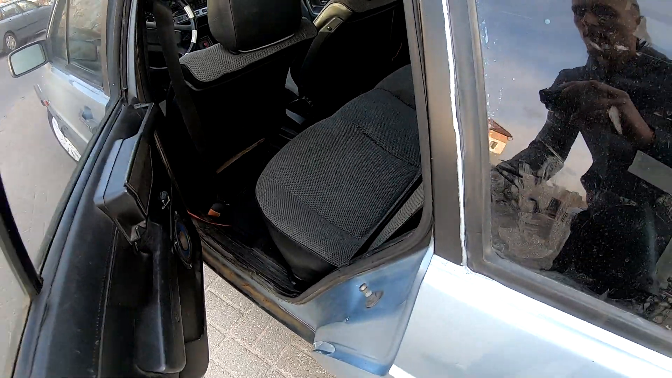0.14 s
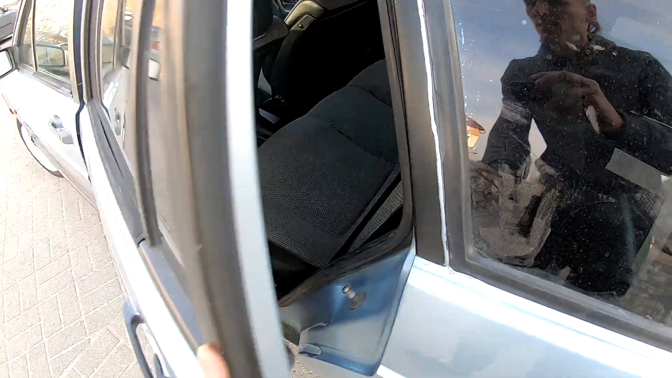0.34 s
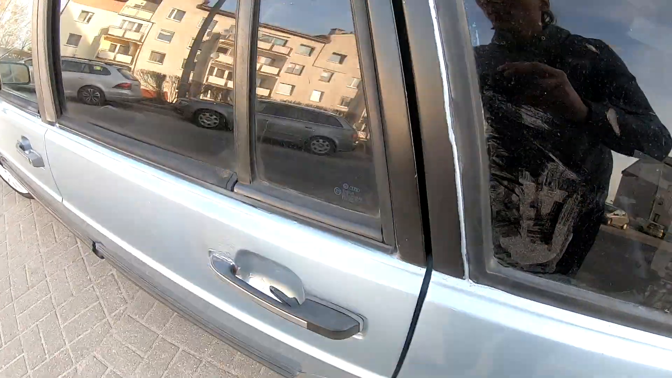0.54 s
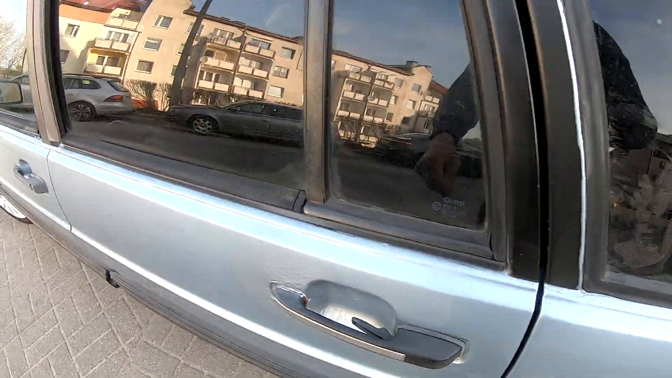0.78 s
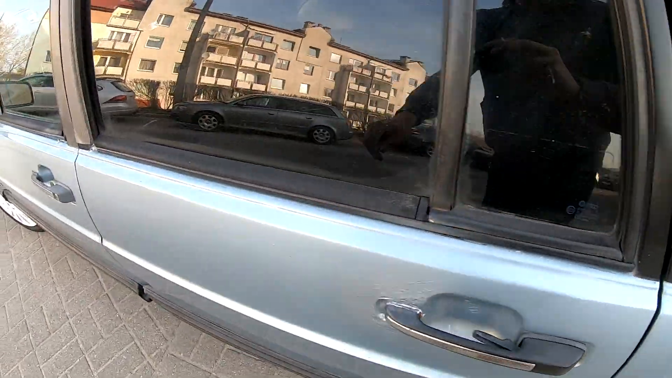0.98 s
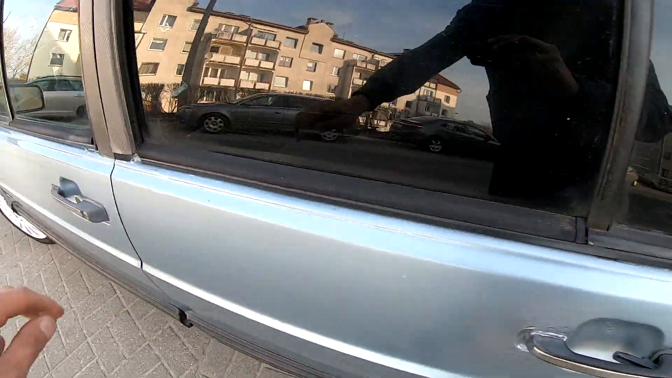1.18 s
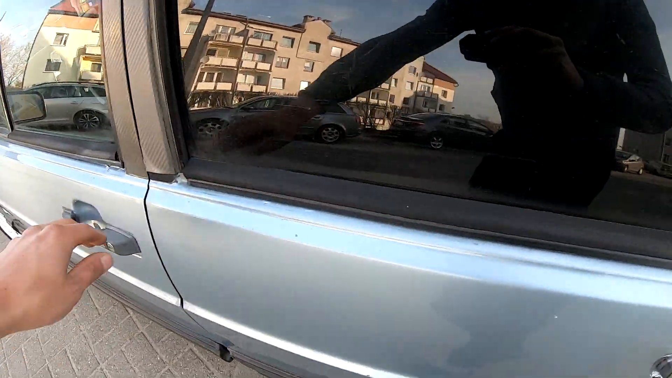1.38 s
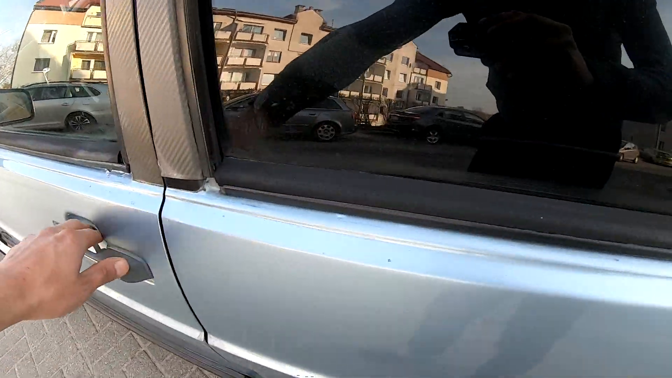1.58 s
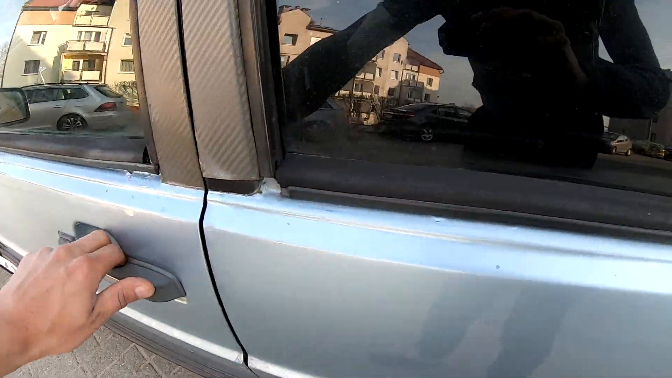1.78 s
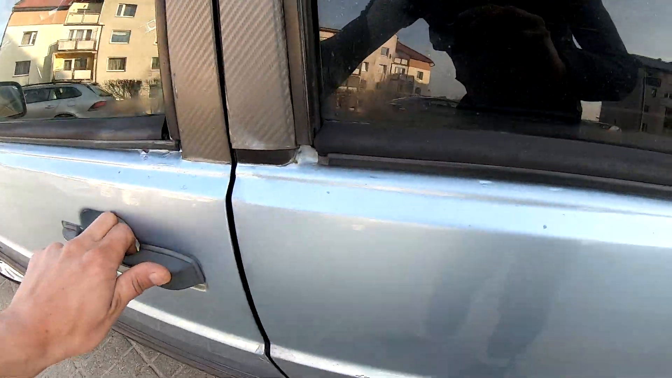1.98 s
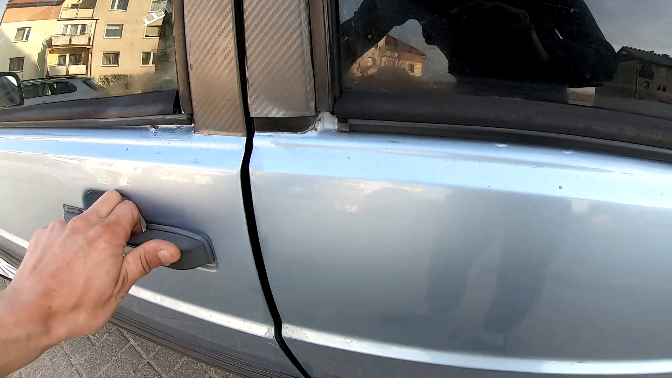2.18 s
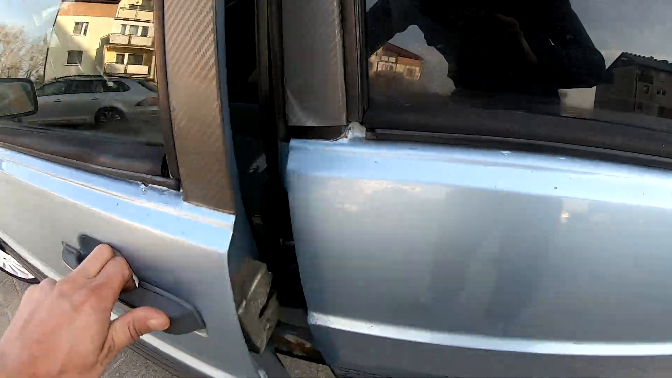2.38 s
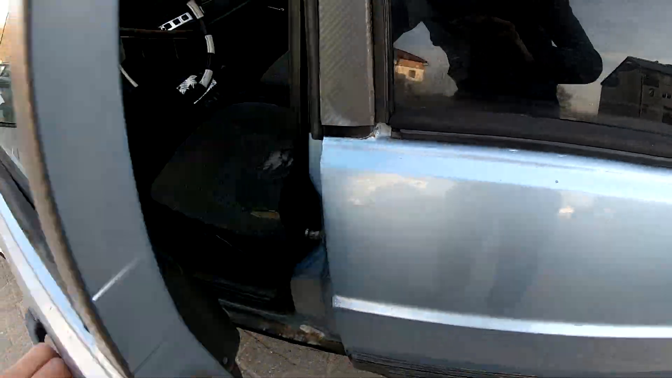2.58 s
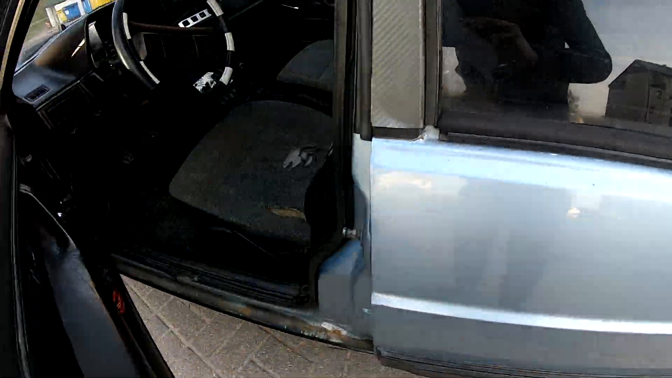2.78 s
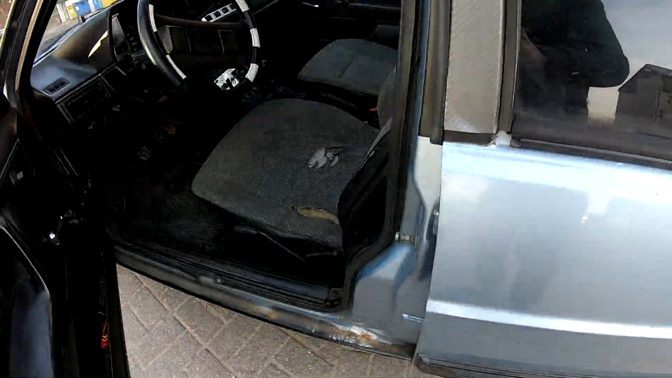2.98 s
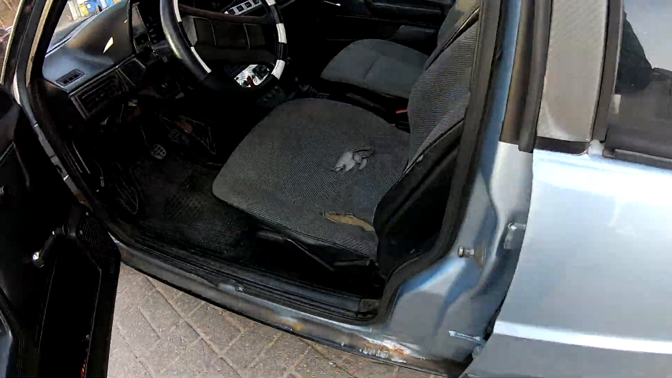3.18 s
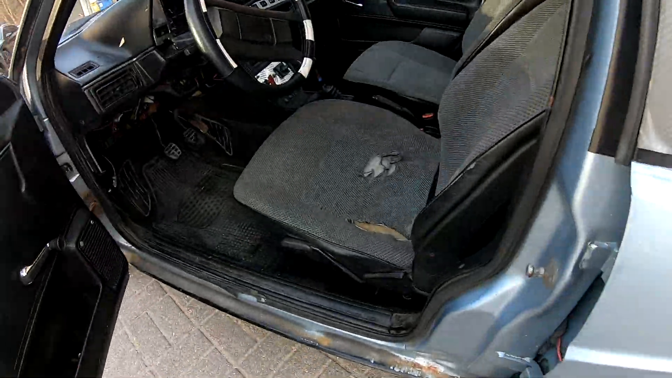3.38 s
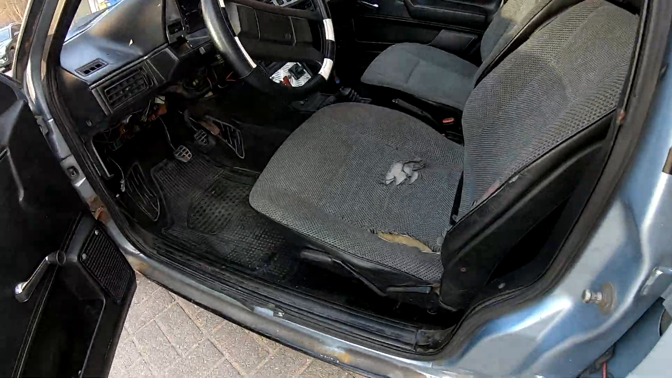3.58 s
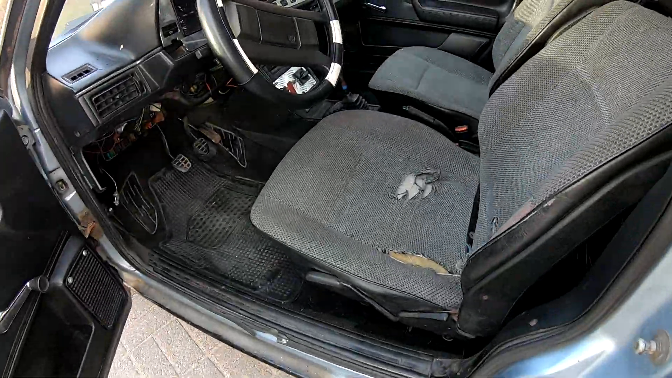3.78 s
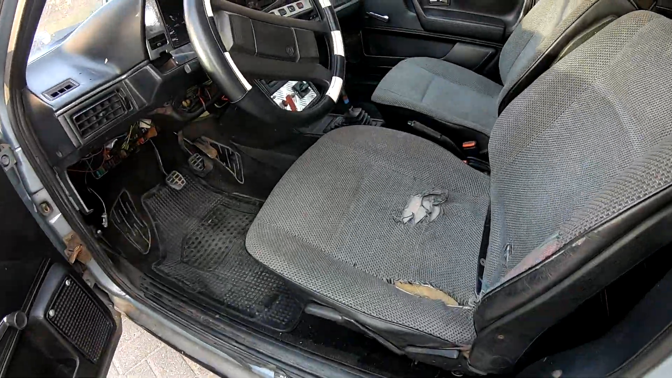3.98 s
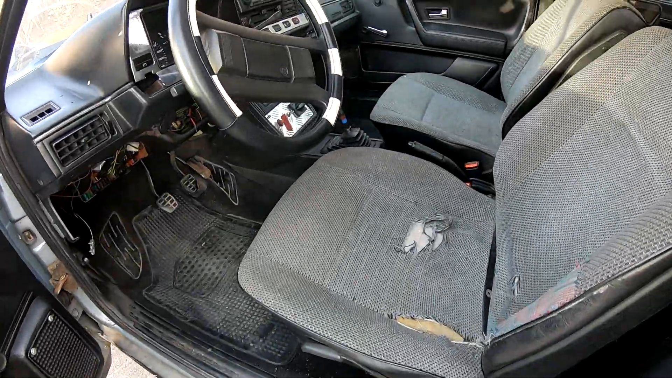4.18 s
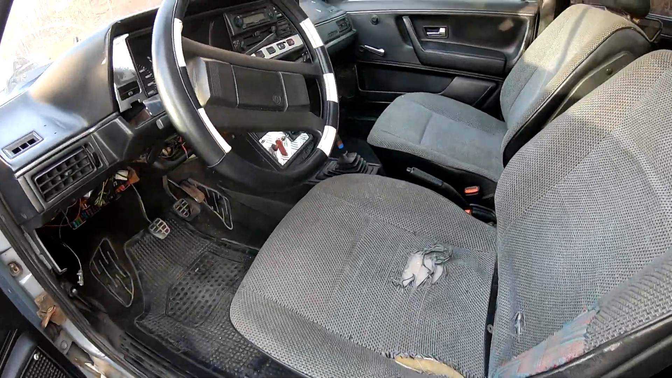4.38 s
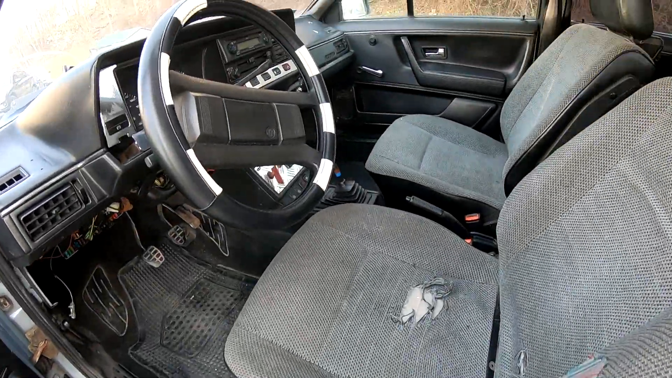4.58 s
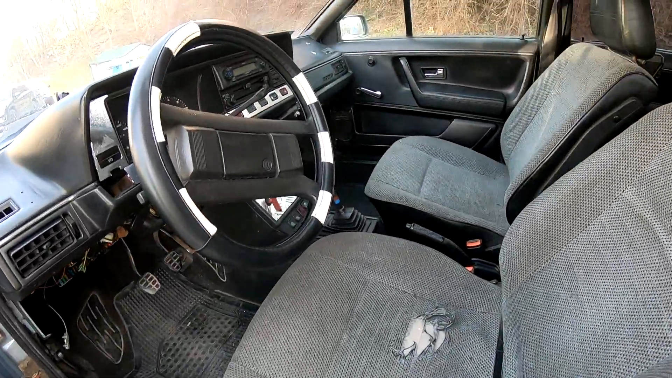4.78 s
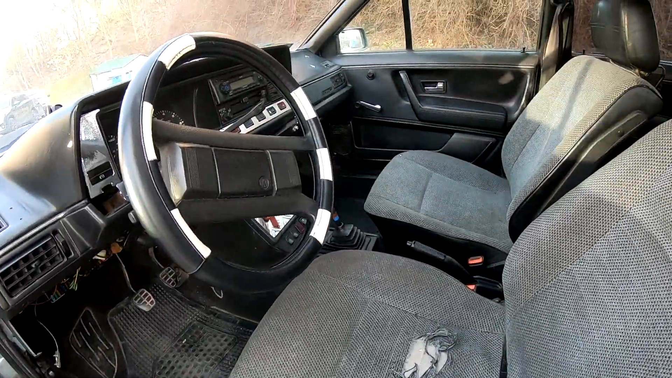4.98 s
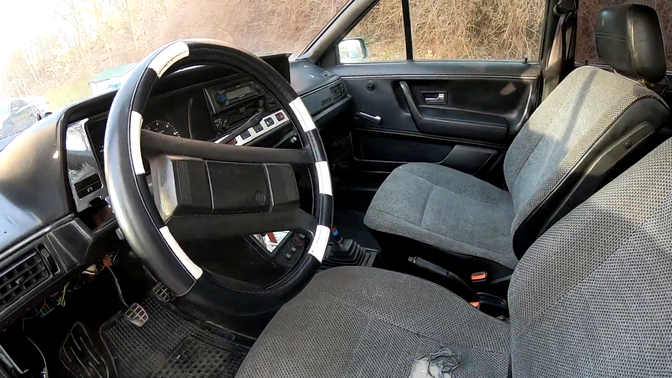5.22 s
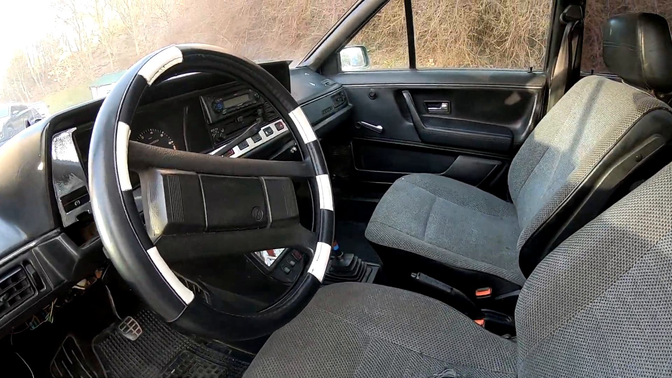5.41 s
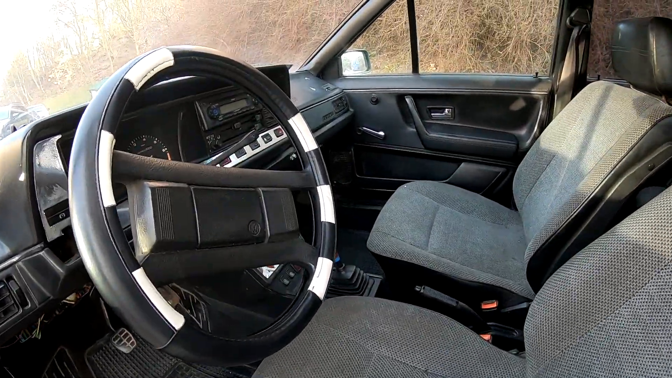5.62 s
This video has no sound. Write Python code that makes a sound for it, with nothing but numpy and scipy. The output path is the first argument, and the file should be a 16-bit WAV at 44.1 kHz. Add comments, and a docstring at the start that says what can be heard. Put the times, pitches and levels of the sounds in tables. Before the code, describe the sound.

A faint hinge squeak and heavy car door slam, then handle clicks and a latch release, over a low engine drone growing hollow inside the cabin.

```python
"""An engine idles close by on a street; its door hinge squeaks faintly and a car's rear door slams.
A hand pulls the front handle, the latch lets go and the door swings open over its check strap.
The microphone then leans into the cabin, where the drone swells; clothes and shoes rustle.
The drone is a harmonic series, the rush of the engine and cabin is filtered noise, and door parts
are short noise bursts and decaying modes."""
import sys
import numpy as np
from scipy import signal
from scipy.fft import rfft, irfft
from scipy.io import wavfile
from scipy.ndimage import uniform_filter1d

SR = 44100
rng = np.random.default_rng(int(sys.argv[2]) if len(sys.argv) > 2 else 0)


def unload_wav(signal):
    """Save mono or channel-first audio to the path in sys.argv[1] as 16-bit WAV at rate SR, clipped to [-1, 1]."""
    wavfile.write(
        sys.argv[1],
        SR,
        np.round(np.clip(np.atleast_2d(signal).T, -1, 1) * 32767).astype(np.int16),
    )


N = 249165
TIME = np.arange(N) / SR

# engine firing, which settles and then creeps up: (time [s], firing rate [Hz])
FIRING = [(0, 63), (.3, 65.24), (.75, 58.4), (1.9, 55.37), (3.6, 56.08), (4.4, 57.54), (5.65, 58.3)]
# drone where the microphone is: (time [s], firing tone [dB], overtones [dB])
DRONE_LEVEL = [(0, -32, -44), (.5, -27, -43.5), (1.5, -36.5, -45.5), (2.1, -27.5, -37), (2.6, -31, -37.5),
               (3.1, -23, -32.5), (3.6, -23.5, -29), (4.0, -17, -30.5), (4.8, -22, -32),
               (5.65, -32.5, -34.5)]
# second to fifth harmonic, relative to the overtone level: (level [dB])
OVERTONES_DB = [2, -1.5, -11.5, -19]
# nearness to the running engine, which sets its noises: (time [s], nearness [dB])
NEARNESS = [(0, -8), (.5, -5.5), (1.6, -5.5), (2.0, -2), (3.3, -1.5), (4.1, 0), (4.8, 4), (5.65, .5)]
# spectral shapes of the engine's low, middle and high noise: (frequency [Hz], density [dB per Hz])
RUMBLE = [(12, -4), (30, -5.5), (60, -0.5), (110, 0), (190, -3.5), (270, -8.5), (360, -26), (700, -68)]
WHIRR = [(150, -2), (330, -6.5), (480, -5), (620, -3), (950, -2), (1400, -7), (2000, -12.5), (2700, -15),
         (4000, -28.5), (8000, -57.5)]
HISS = [(1200, -21.5), (2800, 4), (3600, 1.5), (4500, -1.5), (6500, -4), (7400, -9.5), (9800, -10),
        (10800, -21), (12500, -23.5), (14000, -41.5)]
# spectral shape of the cabin's hollow roar: (frequency [Hz], density [dB per Hz])
CABIN = [(200, -19.5), (290, 9), (360, 0), (430, 3), (520, 2), (620, -14), (800, -19.5), (950, -0.5),
         (1200, -21.5), (2000, -56)]
# metal blows of latch, handle and check strap: (time [s], relative level [dB], chatter decay [s],
# spectral tilt [dB per octave], note of the struck part [Hz], relative level of the note [dB])
BLOWS = [(.541, -29.5, 0.018, -5.5, 2800, -6), (.563, -13, 0.0046, 0, 1165, -7),
         (.572, -15.5, 0.0034, 0, 1260, 0), (.579, -14, 0.0045, 1, 2200, -5),
         (.583, -17, 0.0054, 3.5, 5050, -13), (.604, -24.5, 0.017, 0, 850, -2),
         (1.686, -35.5, 0.0032, 4.5, 2780, -9), (1.813, -38, 0.0033, 2.5, 780, -4),
         (1.835, -36, 0.0095, 1, 556, 7), (1.889, -33.5, 0.02, -9.5, 1004, -1),
         (1.9965, -26, 0.012, -5, 2760, -11), (2.183, -44.5, .0066, -13, 724, 12.5),
         (2.286, -34.5, 0.016, 2.5, 943, 5), (2.308, -22.5, 0.0084, 0, 890, -3.5),
         (2.321, -27, .016, 0, 437, 2.5), (2.3676, -22, 0.0045, 2.5, 3060, -6),
         (2.764, -34, 0.011, -4.5, 844, 8), (2.937, -32.5, 0.0045, 2, 2410, -4),
         (2.95, -27, 0.0099, 2, 1700, 5.5), (2.9652, -20, 0.005, 5.5, 1705, 3),
         (2.974, -19.5, 0.0082, -4.5, 740, 0.5), (2.994, -29, 0.0056, 5.5, 4960, -8)]
# spectral shape of struck steel before tilting: (frequency [Hz], density [dB per Hz])
STEEL = [(60, -21), (200, 12.5), (400, -3), (700, -1.5), (1200, 1), (2200, -3.5), (3200, -8), (5500, -16),
         (7000, -25.5), (9500, -27.5), (11500, -38), (14500, -55)]
# modes of the door's steel: (frequency [Hz], relative level [dB], t60 [s])
STEEL_MODES = [(608, -7, 0.19), (890, -21, .15), (938, 3, .1), (1213, -9, 0.24), (1240, -5, 0.09),
               (1638, 0.5, 0.14), (1800, -3, 0.094), (1947, 6.5, 0.058), (2454, -1, 0.059),
               (2426, -2.5, 0.057), (3330, -70, .08), (3680, -8, 0.048), (4150, 6.5, 0.023),
               (5200, -40, .08), (5800, -9, 0.069), (7940, -16, 0.11)]
# echoes of the street: (frequency [Hz], t60 [s])
STREET_DECAY = [(100, 0.92), (500, 0.39), (2000, 0.98), (6000, 0.83), (12000, 0.48)]
# pushes on the whole door: (time [s], boom peak [dB], push length [s], share of full ring time [1],
# panel shudder [dB])
PUSHES = [(.563, -19, 0.0025, .42, -15.5), (.582, -3, 0.011, 0.98, -15.5), (0.605, -9, 0.0024, 0.86, -18.5),
          (2.373, -22, 0.0044, 0.27, -45), (2.975, -22, .002, 0.15, -35.5)]
# modes of door skin and cabin air: (frequency [Hz], relative level [dB], full t60 [s])
BOOM_MODES = [(32.2, -1.5, 0.95), (46.2, 5, 0.43), (72.5, -2.5, 1), (85, -6, 0.2), (98, 1.5, 0.74),
              (129, -14, 0.22), (200, -26, 0.43), (224.5, 4, 0.42), (278, 0.5, 0.089), (308, -15, 0.096),
              (384, -0.5, 0.24), (503, -20, .24), (604, -8, .22)]
# spectral shape of shuddering trim and glass: (frequency [Hz], density [dB per Hz])
BODY = [(30, -34), (90, 11.5), (200, 5), (330, 0.5), (420, -6.5), (600, -3), (900, -16), (1500, -49),
        (4000, -60)]
# sleeve, fingers and soles rubbing: (time [s], length [s], level [dB])
RUSTLES = [(1.003, 0.14, -43.5), (1.151, .045, -51), (1.642, 0.039, -46.5), (1.938, 0.36, -55),
           (2.542, 0.089, -50), (3.002, 0.29, -56.5), (3.636, .13, -47.5), (4.179, .04, -51),
           (5.141, 0.047, -46.5)]
# spectral shape of rubbing: (frequency [Hz], density [dB per Hz])
CLOTH = [(400, 5), (1500, 2.5), (3200, 3.5), (6500, -1.5), (9800, -4.5), (11500, -14), (14000, -26)]
# sharp ticks of the handle spring and small parts: (time [s], relative level [dB])
TICKS = [(1.004, -39), (1.665, -40), (1.835, -32.5), (2.015, -31.5), (2.080, -35.5), (2.099, -26),
         (2.108, -25.5), (2.189, -31.5), (2.302, -32), (2.316, -22.5), (2.815, -37), (3.673, -35.5),
         (4.094, -39.5), (4.213, -38.5), (5.164, -34.5)]
# spectral shape of the ticks: (frequency [Hz], density [dB per Hz])
SPRING = [(500, -38), (2400, -13.5), (3400, 8.5), (4600, -3.5), (6500, -2), (9500, -3.5), (11500, -16.5),
          (14500, -27)]
# the handle reaches its stop and knocks on the hollow door: (time [s], peak level [dB])
KNOCKS = [(1.999, -13), (2.012, -12), (2.025, -27)]
# modes of the hollow door: (frequency [Hz], relative level [dB], t60 [s])
HOLLOW_MODES = [(49, -6, 0.44), (127, 0.5, 0.106), (180, 1.5, 0.08), (228, -8.5, 0.092), (480, -17, 0.057)]
# modes of the check strap: (frequency [Hz], relative level [dB], t60 [s])
STRAP_MODES = [(272, -0.5, 0.046), (333, -2.5, 0.06), (1260, -9.5, .04), (2090, -5, 0.027),
               (2270, -9, 0.021), (2550, -14, 0.035)]
# stereo width: (frequency [Hz], gain of the side signal [dB])
WIDTH = [(60, -4), (250, -18), (500, -2.5), (1000, 3), (2300, 5), (2900, 0.5), (3500, -41)]

RUMBLE_DB, WHIRR_DB, HISS_DB = -33.5, -41.5, -56  # at a nearness of 0 dB, before the changes below
RUMBLE_GROWTH, HISS_GROWTH = 0.86, 1.21  # dB for each dB of nearness
RUMBLE_WITH_DRONE, USUAL_DRONE_DB = 0.38, -26.5  # rumble also swells where the firing tone is strong
NODE_S, NODE_WIDTH_S, NODE_DB = 4.55, .35, -21  # microphone passes a dead spot of the second harmonic
SCREEN_DB, SCREEN_END_S = -13, 0.38  # the open door screens the hiss until it swings away
ENTER_S, ENTER_TAKES_S = 3.53, 0.33  # the microphone leans into the cabin
OUTSIDE_DB, INSIDE_DB = -62, -46  # cabin roar before the two changes below
DOORWAY_S, DOORWAY_WIDTH_S, DOORWAY_DB = 4.06, .2, 5  # extra roar in the door opening
DEEPER_DB_PER_S = 2.5  # steady rise of the roar, zero at DOORWAY_S
SQUEAK_S, SQUEAK_HZ, SQUEAK_SINK_HZ_PER_S = .11, 2700, 2200  # the hinge as the door swings shut
SQUEAK_DB, SQUEAK_RISE_S, SQUEAK_LENGTH_S = -54, 0.028, 0.25
REBOUND_S, REBOUND_DB = .021, -21  # each struck part bounces once
# the spring crackles as the handle is pulled
PULL_S, PULL_LENGTH_S, PULL_TICKS_PER_S, PULL_TICK_DB = 1.95, .13, 35, -39
# faint ticks of handling
STRAY_FROM_S, STRAY_LENGTH_S, STRAY_TICKS_PER_S, STRAY_TICK_DB = 1.25, 3.1, 4.6, -47.5
DRAG_S, DRAG_LENGTH_S, DRAG_DB, SLIPS_PER_S = 2.78, 0.21, -38, 180  # check strap as the door opens
AGC_THRESHOLD_DB, AGC_ATTACK_S, AGC_RECOVERY_DB_PER_S = -19, 0.21, 12
EDGE_HZ = 14400  # upper band limit


def amp(db):
    """Level to amplitude: 20 dB is a factor of ten."""
    return 10 ** (np.asarray(db) / 20)


def unit(x):
    """Normalization: scales a signal to rms 1."""
    return x / np.sqrt(np.mean(x ** 2) + 1e-20)


def along(rows):
    """Linear interpolation: each column of a time curve at every sample."""
    s, *columns = np.transpose(rows)
    return [np.interp(TIME, s, column) for column in columns]


def at_hz(points, hz):
    """Spectral interpolation: reads a curve on a log-frequency axis."""
    f, value = np.transpose(points)
    return np.interp(np.log(hz + 1), np.log(f), value)


def add(mix, s, sound):
    """Superposition: adds a sound to the mix in place from time s."""
    part = mix[..., round(s * SR):][..., :sound.shape[-1]]
    part += sound[..., :part.shape[-1]]


def colour(x, points, tilt_db=0, size=4096):
    """Minimum-phase filtering: a causal filter of unit energy shapes the spectrum."""
    hz = abs(np.fft.fftfreq(size, 1 / SR))
    octaves = np.log2(np.maximum(hz, 400) / 1000)  # the tilt stops below 400 Hz
    log_gain = np.log(amp(at_hz(points, hz) + tilt_db * octaves))
    # the phase follows from the log gain by the Hilbert transform
    response = np.exp(np.conj(signal.hilbert(log_gain)))
    taps = np.fft.ifft(response).real[:size // 2]
    taps = taps / np.linalg.norm(taps)
    return signal.oaconvolve(x, taps[None], axes=1)[:, :x.shape[1]]


def noise(size, side=1):
    """Interchannel correlation: white noise in two channels; side 0 is mono, 1 unrelated."""
    mid, difference = rng.standard_normal((2, size))
    return unit(np.array([mid + side * difference, mid - side * difference]))


def wander(hz, size=N):
    """Random modulation: joined random points, two per cycle of the given rate, at rms 1."""
    knots = rng.standard_normal(N // 8)
    position = np.arange(size) / SR * 2 * hz
    return unit(np.interp(position, np.arange(len(knots)), knots))


def ring(modes, t, hold=1, scatter=0):
    """Modal decay: a sum of dying sines; scatter varies their balance with the spot struck."""
    hz, db, t60 = np.transpose(modes)[:, :, None]
    share = 1 + scatter * rng.standard_normal(hz.shape)
    decay = amp(db - 60 * t / (t60 * hold))
    return (share * decay * np.sin(2 * np.pi * hz * t)).sum(0)


def arch(t, length):
    """Half-sine envelope: rises from 0 to 1 and back over the given length."""
    return abs(np.sin(np.pi * np.clip(t / length, 0, 1)))


def off_flank(x):
    """Comb filtering: a reflection off the car's side, its delay drifting as the microphone moves."""
    late = TIME - 0.000549 * np.exp(0.17 * wander(2.5))
    return np.array([channel + 0.24 * np.interp(late, TIME, channel) for channel in x])


def engine():
    """Harmonic series and modulated noise: uneven firings drone; noises grow with nearness."""
    turn = 2 * np.pi * np.cumsum(along(FIRING)[0]) / SR + 0.27 * wander(9.2)
    drone_db, overtone_db = along(DRONE_LEVEL)
    near_db = along(NEARNESS)[0]
    rumble_db = RUMBLE_DB + RUMBLE_GROWTH * near_db + RUMBLE_WITH_DRONE * (drone_db - USUAL_DRONE_DB)
    node_db = NODE_DB * np.exp(-((TIME - NODE_S) / NODE_WIDTH_S) ** 2)

    drone = amp(drone_db + 0.23 * wander(25)) * np.cos(turn)
    for k, db in enumerate(OVERTONES_DB, 2):
        level_db = overtone_db + db + (k == 2) * node_db + 1.85 * wander(8)
        drone += amp(level_db) * np.cos(k * turn + 2 * np.pi * rng.random())

    # whirr and hiss throb with the firings, and at half their rate
    throb_db = 0.8 * np.cos(turn) + 0.3 * np.cos(turn / 2) + 0.13 * wander(30)
    screen_db = SCREEN_DB * np.maximum(1 - TIME / SCREEN_END_S, 0)
    hiss_db = HISS_DB + HISS_GROWTH * near_db + screen_db + 1.5 * throb_db
    rumble = amp(rumble_db) * colour(noise(N), RUMBLE)
    whirr = amp(WHIRR_DB + near_db + throb_db) * colour(noise(N, side=0.69), WHIRR)
    hiss = amp(hiss_db) * colour(noise(N, side=0.69), HISS)
    return drone + rumble + off_flank(whirr + hiss)


def cabin():
    """Cavity coloration: the interior's hollow roar rises, most strongly in the door opening."""
    inside = np.clip((TIME - ENTER_S) / ENTER_TAKES_S, 0, 1)
    db = OUTSIDE_DB + (INSIDE_DB - OUTSIDE_DB) * inside
    db = db + DEEPER_DB_PER_S * (TIME - DOORWAY_S)
    db = db + DOORWAY_DB * np.exp(-((TIME - DOORWAY_S) / DOORWAY_WIDTH_S) ** 2)
    return amp(db + 2.0 * wander(25)) * colour(noise(N, side=0.2), CABIN)


def squeak():
    """Frequency modulation: an unsteady squeal swells quickly, then fades as it sinks in pitch."""
    t = np.clip(TIME - SQUEAK_S, 0, SQUEAK_LENGTH_S)
    unsteady = 1 + .009 * wander(201) + 0.0083 * wander(25)
    hz = (SQUEAK_HZ - SQUEAK_SINK_HZ_PER_S * t) * unsteady
    swell = np.minimum(t / SQUEAK_RISE_S, 1) * np.sqrt(1 - t / SQUEAK_LENGTH_S)
    return swell * amp(SQUEAK_DB + 2.1 * wander(70)) * np.sin(2 * np.pi * np.cumsum(hz) / SR)


def blow(chatter, tilt_db, note_hz, note_db):
    """Impact excitation: steel chatters, the struck part sounds its note and the door rings on."""
    t = np.arange(SR // 3) / SR
    contact = (1 - np.exp(-t / 0.00048)) * (np.exp(-t / chatter) + amp(-22) * np.exp(-t / 0.018))
    bounces = noise(len(t), side=0.63) * amp(3.8 * wander(900, size=len(t)))
    crack = unit(colour(bounces * contact, STEEL, tilt_db)) * np.sqrt(np.mean(contact ** 2))
    note_envelope = (1 - np.exp(-t / 0.00031)) * np.exp(-t / 0.0062)
    note = amp(note_db) * note_envelope * np.sin(2 * np.pi * note_hz * t)
    steel = np.array([ring(STEEL_MODES, t, scatter=0.61) for _ in range(2)])  # one per channel
    return amp(3.0) * crack + amp(0.5) * note + amp(-19.5) * steel


def latch():
    """Impact and rebound: every metal blow is followed by one weaker blow."""
    out = np.zeros((2, N))
    for s, db, *part in BLOWS:
        add(out, s, amp(db) * blow(*part))
        add(out, s + REBOUND_S, amp(db + REBOUND_DB) * blow(*part))
    return out


def street(x):
    """Diffuse reflection: scattered echoes from paving, parked cars and house fronts."""
    sparse = noise(SR) * (rng.random(SR) < .1)
    hz, t, z = signal.stft(sparse, SR, nperseg=256)
    decay = amp(-60 * t / at_hz(STREET_DECAY, hz)[:, None])
    z = z * decay * (1 - np.exp(-t / 0.031))
    tail = signal.istft(z, SR, nperseg=256)[1]
    return signal.fftconvolve(x, tail / np.linalg.norm(tail[0]), axes=1)[:, :N]


def thumps():
    """Forced modal response: pushes on the door, the seal taking its weight at the slam and the door jolting as
    it opens; skin and air boom, trim and glass shudder."""
    out = np.zeros((2, N))
    t = np.arange(SR * 3 // 4) / SR
    for s, db, length, hold, shudder_db in PUSHES:
        push = np.sin(np.pi * np.minimum(t / length, 1))
        boom = signal.fftconvolve(ring(BOOM_MODES, t, hold), push)[:len(t)]
        fade = (1 - np.exp(-t / 0.003)) * np.exp(-t / 0.048)
        shudder = unit(colour(noise(len(t), side=0.41) * fade, BODY)) * np.sqrt(np.mean(fade ** 2))
        add(out, s, amp(db) * boom / abs(boom).max() + amp(shudder_db) * shudder)
    return out


def rustles():
    """Sliding friction: short strokes of fine, clumped noise grains."""
    out = np.zeros((2, N))
    for s, length, db in RUSTLES:
        stroke = np.sqrt(arch(TIME[:SR // 2], length))
        clumps_db = 2.5 * wander(299, size=len(stroke)) + 1.8 * wander(35.6, size=len(stroke))
        grains = unit(noise(len(stroke), side=0.51) * amp(clumps_db))
        add(out, s, amp(db) * stroke * grains)
    return colour(out, CLOTH)


def sprinkle(start, length, per_s, db):
    """Jittered timing: one event of uneven strength in each time slot, as rows (time [s], level [dB])."""
    slots = np.arange(start, start + length, 1 / per_s)
    late, strength = rng.random((len(slots), 2)).T
    return list(zip(slots + late / per_s, db + 9 * (strength - .5)))


def ticks():
    """Transient excitation: tiny bright noise snaps with a very short ring."""
    out = np.zeros((2, N))
    t = np.arange(SR // 20) / SR
    crackle = sprinkle(PULL_S, PULL_LENGTH_S, PULL_TICKS_PER_S, PULL_TICK_DB)
    strays = sprinkle(STRAY_FROM_S, STRAY_LENGTH_S, STRAY_TICKS_PER_S, STRAY_TICK_DB)
    decay = np.exp(-t / 0.0029) + amp(-18.0) * np.exp(-t / 0.012)
    for s, db in TICKS + crackle + strays:
        add(out, s, amp(db - 3.0) * noise(len(t), side=0.64) * decay)
    return colour(out, SPRING)


def knocks():
    """Cavity resonance: dull knocks through the handle's mount ring the hollow door."""
    out = np.zeros((2, N))
    t = np.arange(SR // 3) / SR
    hollow = ring(HOLLOW_MODES, t) * (1 - np.exp(-t / 0.0032))
    for s, db in KNOCKS:
        add(out, s, amp(db) * hollow / abs(hollow).max())
    return out


def strap():
    """Stick-slip friction: uneven slips ring the check strap's steel, swelling and easing with the swing."""
    t = np.arange(SR // 8) / SR
    slip_rate = np.maximum(SLIPS_PER_S * (1 + .5 * wander(200)), 0)
    slips = np.diff(np.floor(np.cumsum(slip_rate) / SR), prepend=0)  # 1 at each slip
    rub = unit(signal.oaconvolve(slips * rng.standard_normal(N), ring(STRAP_MODES, t))[:N])
    return amp(DRAG_DB) * arch(TIME - DRAG_S, DRAG_LENGTH_S) * rub


def gain_control(x):
    """Dynamic compression: a loud sound turns the gain down; it recovers at a steady rate in dB."""
    power_db = 10 * np.log10(abs(uniform_filter1d((x ** 2).mean(0), size=2048)) + 1e-12)
    recovery = AGC_RECOVERY_DB_PER_S * TIME
    held_db = np.maximum.accumulate(power_db + recovery) - recovery  # falling peak hold
    over_db = np.maximum(held_db - AGC_THRESHOLD_DB, 0)
    keep = np.exp(-1 / (AGC_ATTACK_S * SR))
    return x * amp(-signal.lfilter([1 - keep], [1, -keep], over_db))


def scene():
    """Superposition: door sounds, a little to the left, and their echoes over the idling engine."""
    door = latch() + thumps() + knocks() + ticks() + rustles() + strap()
    door = door * amp([[.6], [-.6]])
    return door + amp(-23.5) * street(door) + engine() + cabin() + squeak()


def record(dry):
    """Mid-side and band filtering: gain control, frequency-dependent width, low cut and band limit."""
    left, right = gain_control(dry)
    mid, side = (left + right) / 2, (left - right) / 2
    side = irfft(rfft(side) * amp(at_hz(WIDTH, np.fft.rfftfreq(N, 1 / SR))), N)
    low_cut = signal.butter(1, 14, "highpass", fs=SR, output="sos")
    pair = signal.sosfilt(low_cut, [mid + side, mid - side])
    band_limit = signal.firwin(511, EDGE_HZ, window=("kaiser", 9), fs=SR)
    return signal.oaconvolve(pair, band_limit[None], "same", axes=1)


dry = scene()
out = record(dry)
unload_wav(out)
```